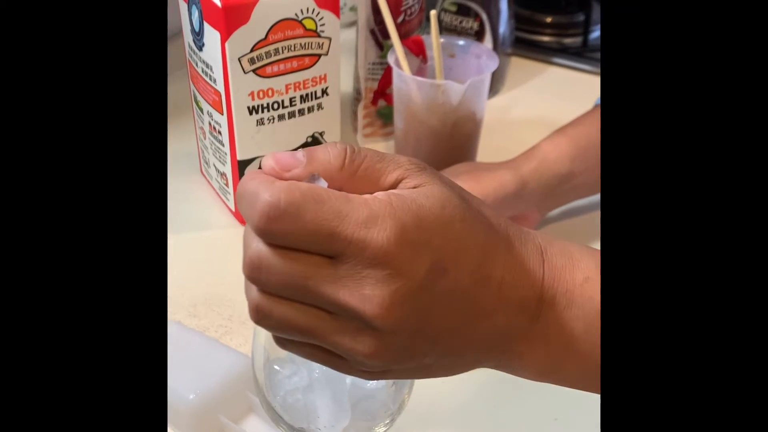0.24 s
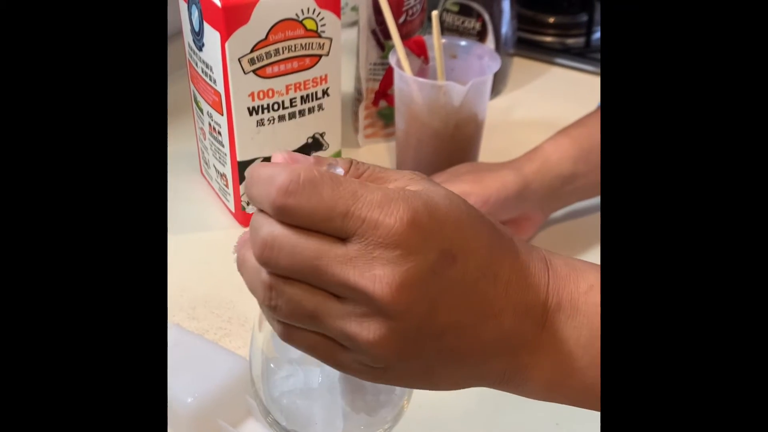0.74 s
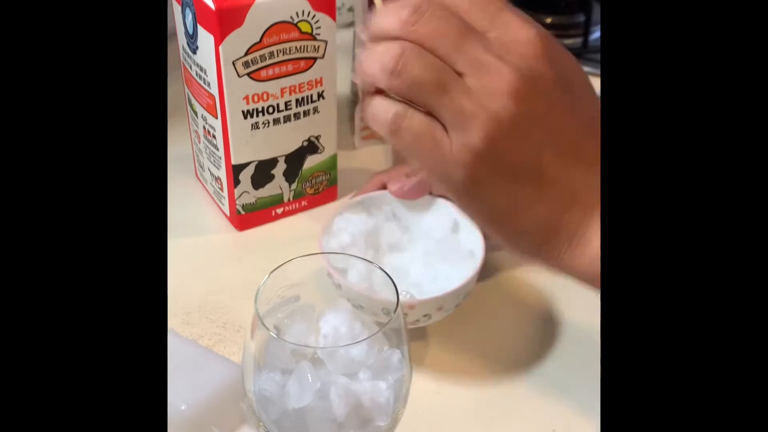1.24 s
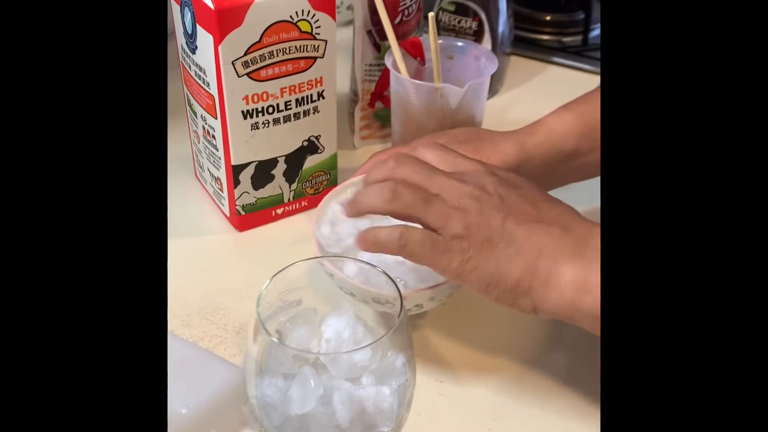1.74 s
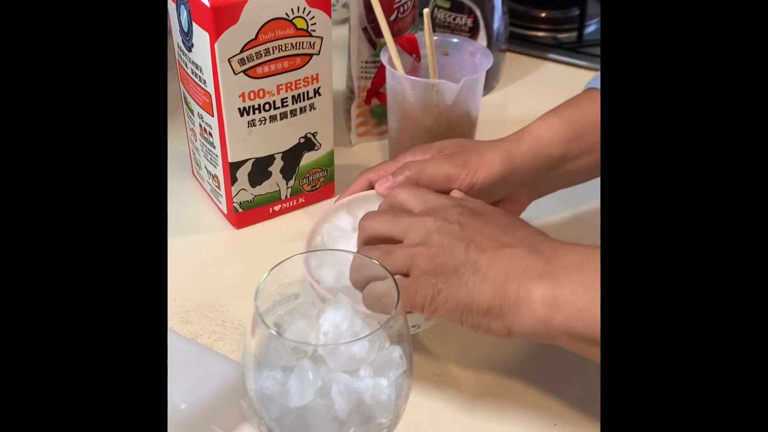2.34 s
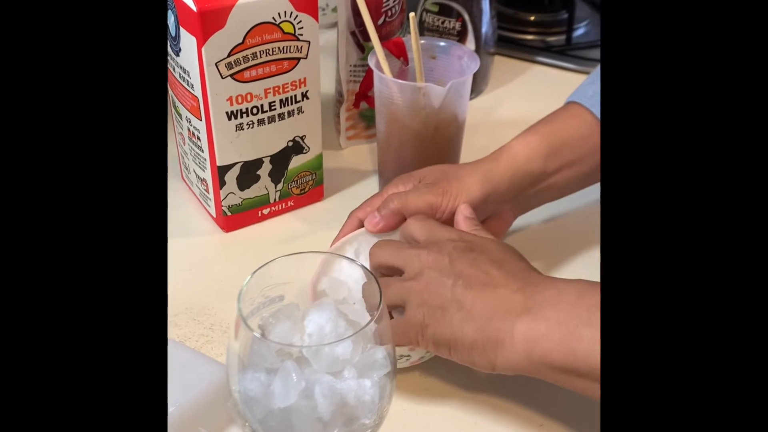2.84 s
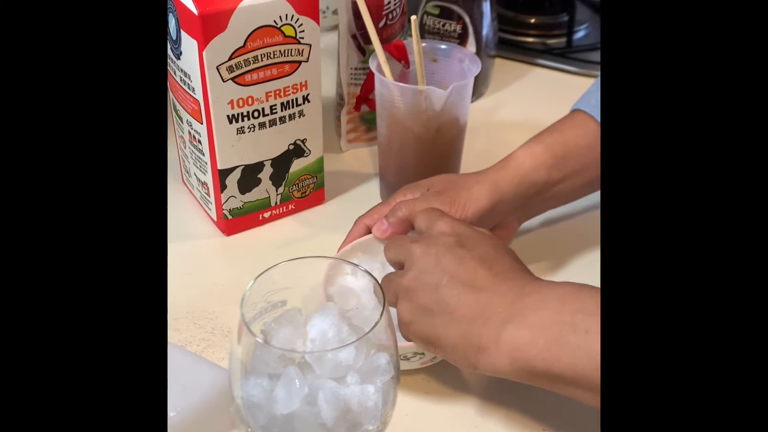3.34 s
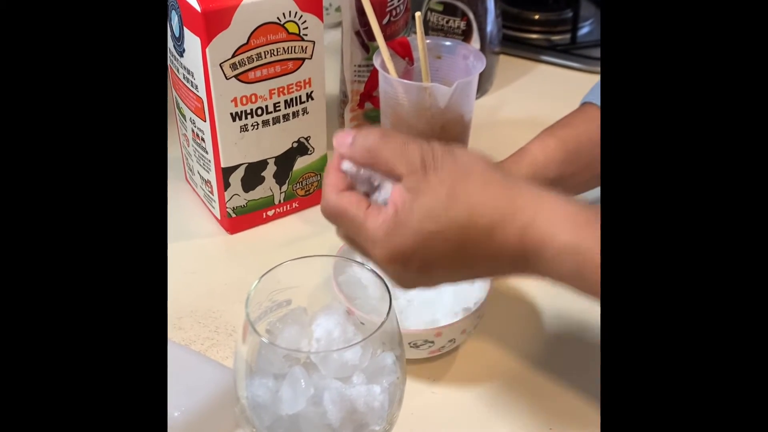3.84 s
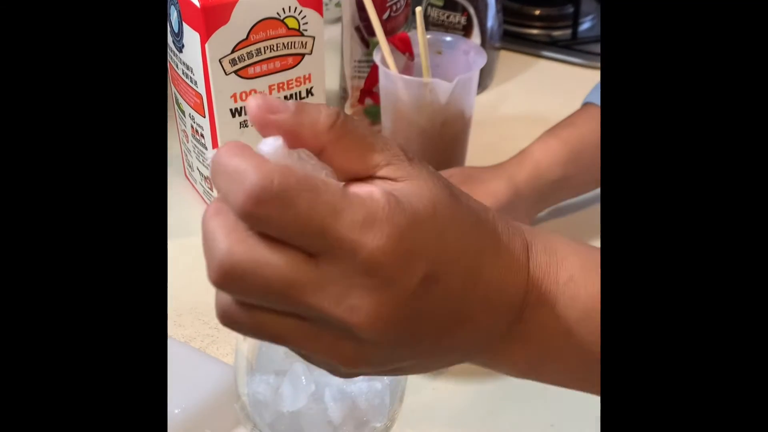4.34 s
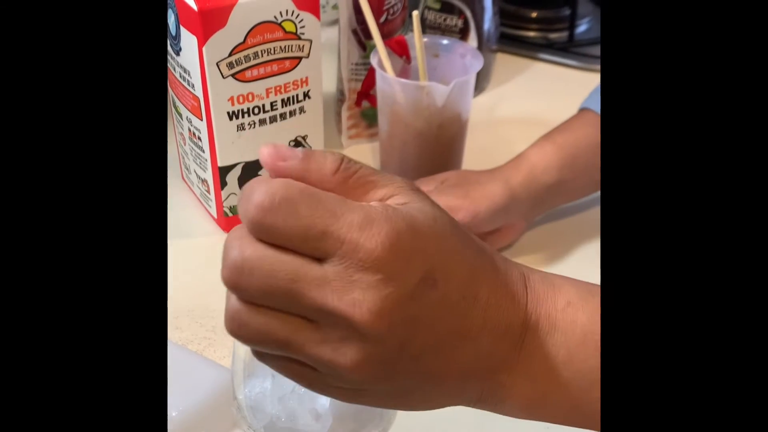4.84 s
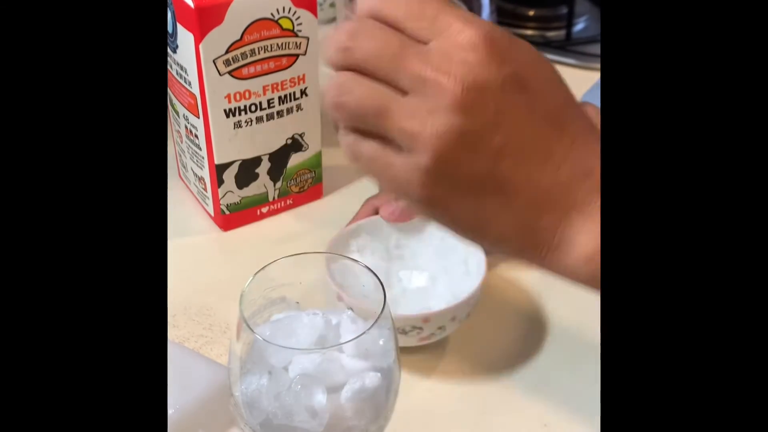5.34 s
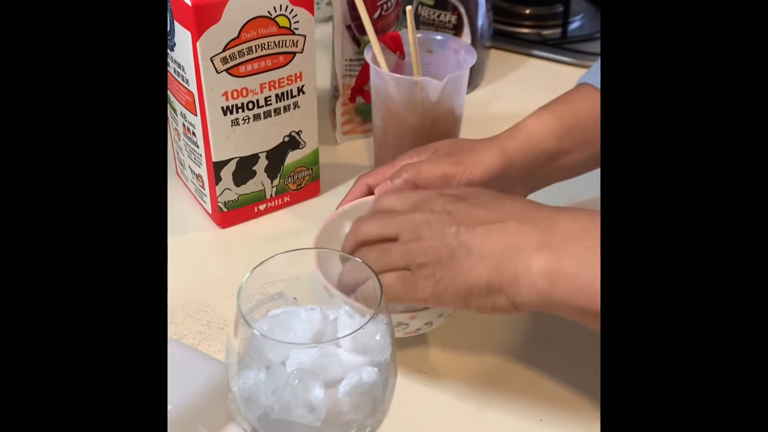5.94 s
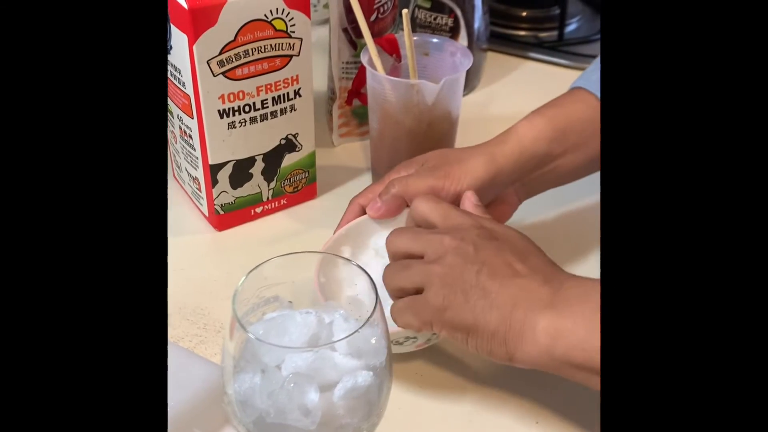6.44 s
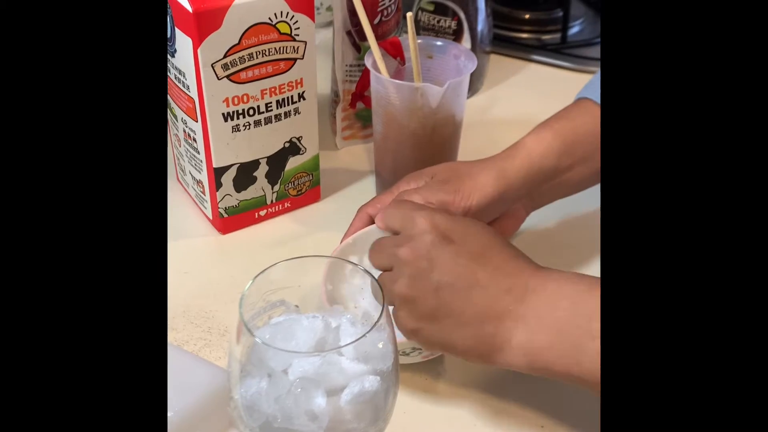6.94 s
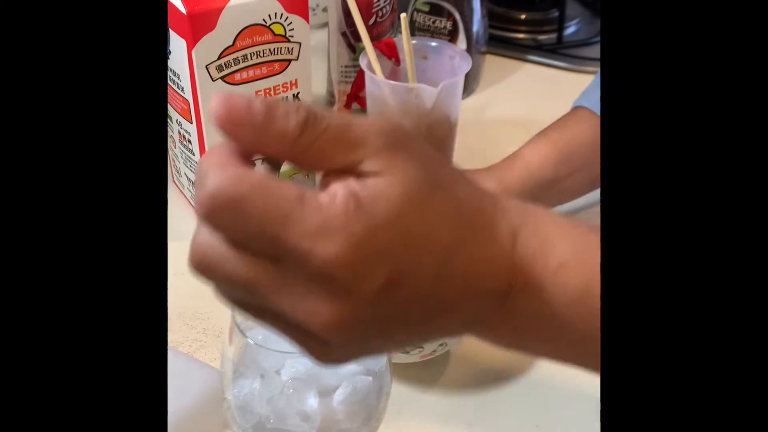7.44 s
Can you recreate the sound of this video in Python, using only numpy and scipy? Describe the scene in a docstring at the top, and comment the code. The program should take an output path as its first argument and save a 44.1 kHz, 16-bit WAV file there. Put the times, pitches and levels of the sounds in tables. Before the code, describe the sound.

A low, slightly unsteady appliance hum and soft room noise run throughout, in a small hard kitchen heard closely in stereo. Faint sliding begins at once; from 0.25 to 0.6 seconds ice cubes tumble into a glass of ice, bright, dry clinks peaking near 0.5 to 0.6, with another cluster at 0.8 to 0.9 and stray ticks until 1.2. From 1.4 to 3.7 fingers dig in a china bowl of wet ice: uneven crunching, scrapes and brittle snaps, strong near 1.6, 2.2 and 3.0. The bowl knocks hard on the counter at 2.8 and slightly softer at 3.1, the loudest events. Soft rubbing follows near 3.8 to 4.5. A second handful clinks in from 4.54 to 4.9. Quieter digging runs from about 5.5 to 7.0, with a sharper snap at 6.4. A very faint raspy squeak comes at 7.1, then a soft dull bump with a low tail at 7.4.

```python
"""On a kitchen counter, ice cubes slip from a fist into a glass already half full of ice.
Each landing is a burst of noise plus the fading tones of cube, glass and hollow; slides are many tiny ticks.
Between handfuls the fingers dig through wet ice in a china bowl: crunching ticks and short snaps.
The bowl knocks hard on the counter twice, and one soft, dull bump with a low tail comes near the end.
An appliance hums over low air noise; the small hard room answers, and two close microphone ports listen."""
import sys
import numpy as np
from scipy import signal
from scipy.fft import rfft, irfft, next_fast_len
from scipy.io import wavfile

SR = 44100
rng = np.random.default_rng(int(sys.argv[2]) if len(sys.argv) > 2 else 0)


def wav_out(sig):
    """Save sig, one row per channel (or a flat mono array), as 16-bit PCM at SR to the path in sys.argv[1]."""
    wavfile.write(sys.argv[1], SR, np.round(np.clip(np.atleast_2d(sig).T, -1, 1) * 32767).astype(np.int16))


N = 338567  # length of the scene in samples
TOP_HZ = 16200  # upper band limit
STIR_ATTACK_S, STIR_RELEASE_S = 0.033, 0.22  # a hand movement builds up, then lets go (release is a t60)

# colour of ice cracking against ice: (frequency [Hz], gain [dB])
CRACK_COLOUR = [(80, -5), (300, 8.5), (950, 9.5), (1500, 4), (2550, 5.5), (3000, -3.5), (3900, 1),
                (5000, 6), (7000, 2), (9500, 2.5), (12000, 1.5), (14000, -1), (16000, -15)]
# colour of cubes tumbling over the pile: (frequency [Hz], gain [dB])
TUMBLE_COLOUR = [(100, -10), (300, -15.5), (620, 1.5), (840, 0.5), (1150, -2), (1500, -15), (2100, -4.5),
                 (2550, 0), (2950, -15), (5000, -15), (10000, -31.5)]
# resonances of the ice-filled bowl: (frequency [Hz], width [Hz], lift [dB])
BOWL_MODES = [(1190, 150, 12), (2245, 320, 8), (3386, 600, 2.5), (5830, 810, 6), (8700, 165, 4),
              (15300, 630, 7.5)]


def amp(db):
    """Turn decibels into a plain multiplier."""
    return 10 ** (np.asarray(db) / 20)


def unit(x):
    """Scale a sound to an rms of 1."""
    return x / np.sqrt(np.mean(x ** 2) + 1e-20)


def along(points, hz):
    """Read a curve of (frequency [Hz], value) points on a log frequency axis."""
    f, v = np.transpose(points)
    return np.interp(np.log(hz + 1), np.log(f + 1), v)


def fade(t, t60):
    """Exponential decay that falls by 60 dB in t60 seconds."""
    return np.exp(-np.log(1000) * t / np.maximum(t60, 1e-4))


def add(track, s, sound):
    """Mix a sound into a track at s seconds."""
    i = max(round(s * SR), 0)
    track[..., i:i + sound.shape[-1]] += sound[..., :track.shape[-1] - i]


def filtered(x, response):
    """Multiply the spectrum of x by a (possibly complex) response of frequency."""
    n = x.shape[-1]
    padded = next_fast_len(n + 4096)
    return irfft(rfft(x, padded) * response(np.fft.rfftfreq(padded, 1 / SR)), padded)[..., :n]


def coloured(x, gain, size=2048):
    """Pass x through a filter that never sounds ahead of its input, with the given gain of frequency."""
    cepstrum = irfft(np.log(np.maximum(gain(np.fft.rfftfreq(size, 1 / SR)), 1e-6)))
    # folding the cepstrum onto its first half puts the filter's energy as early as possible
    cepstrum[1:size // 2] *= 2
    cepstrum[size // 2 + 1:] = 0
    impulse = irfft(np.exp(rfft(cepstrum)))
    return signal.fftconvolve(x, impulse)[:len(x)]


def in_colour(x, colour):
    """Give x the colour of a table of (frequency [Hz], gain [dB])."""
    return coloured(x, lambda hz: amp(along(colour, hz)))


def stroke(start, length, attack, sag_db, release):
    """Gain of one movement: it builds up, holds while sagging by some dB a second, then dies away."""
    t = np.maximum(np.arange(N) / SR - start, 0)
    build = np.minimum(t / attack, 1)
    return build * amp(-sag_db * t) * fade(np.maximum(t - length, 0), release)


def catching(per_second, depth_db):
    """Ice catches and slips: a quickly changing random gain."""
    knots = rng.standard_normal(4096)
    at = np.arange(N) / SR * per_second
    return amp(depth_db * np.interp(at, np.arange(len(knots)), knots))


def grains(per_second, spread_db, top_hz, t60):
    """Tiny slips at random moments, each a very short tick with its own pitch and size."""
    when, pitch, size, side = rng.random((int(per_second * N / SR), 4)).T[:, :, None]
    k = np.arange(SR // 400)  # each tick is cut at 2.5 ms
    strength = np.sign(side - .5) * amp(-spread_db * np.log(np.maximum(size, .04)))
    ticks = strength * fade(k / SR, t60) * np.sin(2 * np.pi * top_hz * pitch * k / SR)
    places = (when * N).astype(int) + k
    return np.bincount(places.ravel(), ticks.ravel(), N)[:N]


def wavering(hz, width_hz):
    """A tone of rms 1 whose strength and phase drift."""
    knots = rng.standard_normal((2, 1024))
    at = np.arange(N) / SR * width_hz
    a, b = (np.interp(at, np.arange(len(k)), k) for k in knots)
    phase = 2 * np.pi * hz * np.arange(N) / SR
    return unit(a * np.cos(phase) + b * np.sin(phase))


def contact_gain(hz, clack_db, knock_db):
    """Heavier contacts put more into the middle and low range."""
    return amp(along([(1800, knock_db), (3600, clack_db), (8500, clack_db), (11000, 0.0063)], hz))


def clinks(ring_db=0.0, cube_db=0.0, crack_db=2, crack_t60=0.021, clack_db=-1, knock_db=-5):
    """Each cube cracks against the pile, sounds its own note and rings the glass more or less strongly."""
    # ice landing in the glass: (time [s], bright level [dB], relative body level [dB],
    # relative glass ring level [dB], cube's note [Hz], relative note level [dB])
    landings = [(0.2364, -37, -6, -4, 3400, -20), (0.369, -40, -7.5, -0.5, 6030, -3),
                (0.3872, -39.5, -4.5, 8.5, 3800, -18), (0.4387, -43.5, 1, -14, 2490, 10.5),
                (0.4561, -43, 6.5, -11, 3450, 0.5), (0.4823, -27, -3, -7, 4950, 7),
                (0.487, -22.5, -9.5, -9.5, 6180, 5), (0.5196, -24, -10.5, 0, 3800, -8),
                (0.533, -35, -2.5, -5, 3420, 0), (0.582, -17, -16.5, 4.5, 8560, 1.5),
                (0.5912, -19.5, -16, -8, 12450, -14), (0.775, -60, 4, -13, 4550, 9),
                (0.799, -34, -7, 0.5, 3830, -1), (0.822, -39, 0, -5.5, 2440, 2.5),
                (0.864, -41, 5, -4, 6760, -5), (0.8803, -23, 3.5, -7, 6700, -3),
                (0.8888, -22, 2, -10, 7130, -1.5), (0.897, -32.5, 10, -12, 7950, -5),
                (0.977, -40, -0.5, -3.5, 6000, 1), (1.035, -34.5, 5.5, -8.5, 6680, -5),
                (1.1662, -43.5, -3, -6.5, 5000, -5), (4.5423, -24, -7, -7.5, 1796, 7),
                (4.592, -34.5, 4.5, -12, 5300, 4.5), (4.608, -36, -13.5, 0, 12400, 1.5),
                (4.6154, -20, -17, -6, 3830, -4.5), (4.6444, -25.5, 1, 6, 3860, -4),
                (4.686, -39.5, 1.5, -9.5, 1870, -5), (4.7119, -17, -20, 5.5, 3820, -4),
                (4.7513, -20, -9, 3, 5965, -8), (4.825, -30, -4, -3, 6160, -10),
                (4.887, -27, -8, -15, 5330, -11)]
    out, t = np.zeros(N), np.arange(SR // 5) / SR
    for s, db, body, ring, cube_hz, note in landings:
        burst = rng.standard_normal(len(t)) * fade(t, crack_t60) * (1 - fade(t, 0.0041))
        crack = in_colour(burst, CRACK_COLOUR)
        glass = amp(ring_db + ring) * glass_ring(t, scatter_db=2.5)
        cube = amp(cube_db + note) * cube_ring(t, cube_hz)
        hit = glass + cube + amp(crack_db) * crack
        weighted = coloured(hit, lambda hz: contact_gain(hz, body + clack_db, body + knock_db))
        add(out, s, amp(db) * weighted)
    return out


def glass_ring(t, scatter_db):
    """The glass's modes, at new strengths for each point of contact, nudged in pitch by the shifting ice."""
    # modes of the glass, damped by its ice: (frequency [Hz], level [dB], t60 [s])
    glass_modes = [(2105, -12.5, .06), (2420, -10.5, 0.0697), (3850, -16, 0.095), (5965, -4.5, 0.044),
                   (7040, -18, 0.038), (8540, -6.5, 0.055), (11150, -12.5, .045), (11200, -8, 0.057),
                   (11660, -13.5, .035), (12180, -8.5, 0.04), (14240, -17, .04)]
    hz, db, t60 = np.transpose(glass_modes)[:, :, None]
    size, detune = rng.standard_normal((2, len(glass_modes), 1))
    tones = np.sin(2 * np.pi * hz * (1 + 0.0033 * detune) * t)
    return np.sum(amp(db + scatter_db * size) * fade(t, t60) * tones, axis=0)


def cube_ring(t, hz, ratio_spread=0.073):
    """A cube's own brief note; its uneven shape shifts the upper modes."""
    # modes of an ice cube: (ratio to its lowest note, level [dB], t60 [s])
    cube_modes = [(1, -2.5, 0.044), (1.39, -8.5, .02), (1.93, -10.5, 0.016)]
    ratio, db, t60 = np.transpose(cube_modes)[:, :, None]
    modes = hz * ratio ** (1 + ratio_spread * rng.standard_normal(ratio.shape))
    tones = amp(db) * fade(t, t60) * np.sin(2 * np.pi * modes * t)
    return np.sum((modes < TOP_HZ) * tones, axis=0)


def bumps(clack_db=-2, clack_t60=0.013, scatter_db=3):
    """A cube landing flat on the pile gives a dull clack that rings the hollow of the glass."""
    # cubes dropping flat on the pile: (time [s], relative level [dB])
    drops = [(0.429, -34), (0.4406, -31), (0.466, -28.5), (0.4755, -27.5), (0.492, -34.5), (0.5218, -36.5),
             (0.534, -37.5), (0.554, -37.5), (0.826, -29.5), (0.8907, -24), (0.9022, -33.5), (4.683, -36.5),
             (4.6998, -35.5), (4.7204, -29.5), (4.7518, -38), (4.76, -36)]
    # the hollow of the glass and the pile in it: (frequency [Hz], level [dB], t60 [s])
    hollow_modes = [(830, 0, .05), (1400, -2, .02), (1860, -3, .022), (2500, -1, .025)]
    out, t = np.zeros(N), np.arange(SR // 8) / SR
    hz, db, t60 = np.transpose(hollow_modes)[:, :, None]
    for s, level_db in drops:
        size, detune = rng.standard_normal((2, *hz.shape))
        tones = np.sin(2 * np.pi * hz * (1 + 0.025 * detune) * t)
        ring = np.sum(amp(db + scatter_db * size) * fade(t, t60) * tones, axis=0)
        clack = in_colour(rng.standard_normal(len(t)) * fade(t, clack_t60), TUMBLE_COLOUR)
        hit = unit(ring) + amp(clack_db) * unit(clack)
        add(out, s, amp(level_db + 5) * hit / np.abs(hit).max())
    return out


def sliding(hiss_db=-1, tumble_db=-2.0, ring_db=-30):
    """Wet cubes skid and tumble over the pile in many tiny contacts, keeping the glass ringing."""
    # runs of cubes sliding from the fist into the glass:
    # (start [s], length [s], relative hiss level [dB], relative tumble level [dB])
    runs = [(0, 0.088, -62.5, -78.5), (0.168, .11, -58, -71.5), (0.343, 0.059, -48, -59.5),
            (0.423, 0.15, -37.5, -47.5), (0.797, 0.033, -43.5, -42), (0.881, 0.069, -43, -46.5),
            (0.918, 0.16, -54.5, -58), (4.525, 0.045, -44, -39), (4.672, 0.078, -33, -42.5),
            (4.809, 0.15, -59.5, -61)]
    hiss, tumble = np.zeros((2, N))
    for start, length, run_hiss_db, run_tumble_db in runs:
        # a run gathers speed, slows by 17.5 dB a second, and settles
        run = stroke(start, length, attack=0.02, sag_db=17.5, release=0.095)
        hiss += amp(run_hiss_db) * run
        tumble += amp(run_tumble_db) * run
    slips = grains(per_second=900, spread_db=4.0, top_hz=15500, t60=0.0042)
    ring = signal.fftconvolve(slips, glass_ring(np.arange(SR // 8) / SR, scatter_db=3.0))[:N]
    skid = unit(in_colour(slips, CRACK_COLOUR) + amp(ring_db) * ring)
    large_contacts = grains(per_second=300, spread_db=2.0, top_hz=4580, t60=0.00476)
    roll = unit(in_colour(large_contacts, TUMBLE_COLOUR))
    return amp(hiss_db) * hiss * skid + amp(tumble_db) * tumble * roll


def digging(scrape_db=-2, tick_db=1, tick_rise=0.00353, tick_t60=0.016, clack_db=1, knock_db=-6):
    """Stirred ice crunches in the bowl; now and then a cube grinds free with a snap."""
    # the hand rustling in the ice, in the bowl or round a fistful: (start [s], length [s], relative level [dB])
    rustles = [(1.418, 0.63, -59.5), (2.096, 1.646, -58), (3.71, 0.22, -65.5), (4.214, 0.34, -67),
               (5.99, 1.135, -63), (7.55, 0.3, -66)]
    # single pushes of the fingers through the bowl: (start [s], length [s], relative level [dB])
    pushes = [(1.564, 0.091, -50), (1.844, 0.098, -51), (1.898, 0.029, -43.5), (2.162, 0.1, -48),
              (2.263, 0.047, -45.5), (2.409, 0.096, -45.5), (2.545, 0.085, -42), (2.747, 0.045, -47),
              (2.931, 0.082, -38), (3.073, 0.4, -49), (3.388, 0.039, -41), (3.511, 0.1, -50),
              (5.647, 0.17, -54.5), (5.982, 0.15, -55), (6.138, 0.14, -51.5), (6.297, 0.081, -50),
              (6.543, 0.067, -50), (6.654, 0.047, -45.5), (6.853, 0.05, -56)]
    # cubes snapping past each other:
    # (time [s], relative bright level [dB], relative body level [dB], pitch rung most [Hz])
    snaps = [(1.38, -38.5, -12, 5820), (1.4562, -49, 4, 5800), (1.5875, -40.5, 6, 4000),
             (1.6223, -24.5, -3, 4900), (1.726, -48.5, 4.5, 7000), (1.746, -39, -4.5, 8080),
             (1.8385, -35.5, 4.5, 3960), (1.9034, -39, -3, 2400), (1.9521, -34.5, 1.5, 5900),
             (1.9652, -28.5, 1, 5900), (2.1139, -52.5, 2, 3300), (2.1885, -25.5, -14.5, 1230),
             (2.3146, -32.5, -5, 5800), (2.4844, -34.5, -3.5, 5800), (2.579, -33, 4.5, 3330),
             (2.9785, -22, 1, 1240), (3.2147, -38, 1.5, 1204), (3.4175, -38, 5.5, 5570),
             (3.617, -51, 3.5, 3290), (4.0067, -47.5, -0.5, 6880), (5.125, -49, -21.5, 8870),
             (5.4693, -49.5, -7, 5800), (5.678, -49, 4.5, 5750), (5.9714, -45, -1, 5880),
             (6.0293, -43, -0.5, 1260), (6.18, -45.5, 6, 2370), (6.3595, -49, -2, 5800),
             (6.418, -32.5, 5.5, 4400), (6.5924, -40, 1.5, 3250), (6.7082, -48.5, 9.5, 3180),
             (6.861, -39.5, -6.5, 7220), (6.9194, -42, -3, 5800)]
    effort = sum(amp(db) * stroke(start, length, STIR_ATTACK_S, 0, STIR_RELEASE_S)
                 for start, length, db in rustles)
    for start, length, db in pushes:
        push = stroke(start, length, STIR_ATTACK_S, sag_db=6, release=STIR_RELEASE_S)
        effort = np.maximum(effort, amp(db) * push)
    crunch = grains(per_second=1500, spread_db=2.0, top_hz=15880, t60=0.0026)
    crunch = crunch * catching(per_second=150, depth_db=2.0)
    # stirred cubes jam and give way under the fingers
    effort = effort * unit(catching(per_second=45, depth_db=3))
    broken_ice = unit(crunch) + amp(-1) * unit(chips())
    out = amp(scrape_db) * effort * unit(coloured(broken_ice, bowl_gain))
    t = np.arange(SR // 8) / SR
    for s, db, body, focus_hz in snaps:
        snap = rng.standard_normal(len(t)) * fade(t, tick_t60) * (1 - fade(t, tick_rise))
        hit = coloured(snap, bowl_gain) + amp(-6) * bowl_ring(t, focus_hz)
        weighted = coloured(hit, lambda hz: contact_gain(hz, body + clack_db, body + knock_db))
        add(out, s, amp(db + tick_db) * weighted)
    return out


def chips(spread_db=4.5):
    """Sparse sharp ticks of small chips breaking off, 60 a second."""
    when, size = rng.random((int(60 * N / SR), 2)).T
    strength = amp(-spread_db * np.log(np.maximum(size, .08)))
    return np.bincount((when * N).astype(int), strength, N)[:N]


def bowl_gain(hz):
    """Broad scraping colour lifted by the bowl's resonances."""
    # colour of ice scraping: (frequency [Hz], gain [dB])
    scrape_colour = [(200, 1.5), (700, 1.5), (1700, 1.5), (4500, 1.5), (7000, -0.5), (10000, 0), (12200, 2),
                     (14000, -3), (16000, -19.5)]
    lift = sum(amp(db) ** 2 / (1 + (2 * (hz - centre) / width) ** 2) for centre, width, db in BOWL_MODES)
    return amp(along(scrape_colour, hz)) * np.sqrt(1 + lift)


def bowl_ring(t, focus_hz, focus_octaves=0.57, t60=0.026, detune=0.014):
    """The bowl's modes; the point of contact favours those near one pitch."""
    hz = np.transpose(BOWL_MODES)[0][:, None]
    share = 1 / (1 + (np.log2(hz / focus_hz) / focus_octaves) ** 2)
    shifted_hz = hz * (1 + detune * rng.standard_normal(hz.shape))
    return np.sum(share * fade(t, t60) * np.sin(2 * np.pi * shifted_hz * t), axis=0)


def knocks(ring_db=-1.7, ring_spread=0.5, scatter_db=1, thud_db=3.5, thud_t60=0.052, rattle_db=-9,
           rattle_t60=.36, wet_db=-6.5, foot_db=7, foot_hz=1250, foot_t60=0.0034):
    """A hard clack of the bowl's foot, or a soft dull bump, on the counter: ringing tones, thud and rattle."""
    # two hard knocks, then one soft bump made of two rows, the second lengthening it:
    # (time [s], relative level [dB], contact brightness as a treble limit [Hz])
    raps = [(2.802, -11, 2700), (3.1085, -14.3, 2600), (7.389, -36, 700), (7.422, -38.5, 520)]
    # bowl and counter ringing together:
    # (frequency [Hz], relative level [dB], t60 [s], left minus right [dB])
    counter_modes = [(115, -16.5, 0.4, 0), (268, -7.0, 0.29, -1), (325, -11.5, 0.2, -2),
                     (375, -10.0, 0.22, -4), (428, -13.5, 0.22, 1), (500, -11.5, 0.18, -1),
                     (588, -2.0, 0.15, 1), (680, -13.0, 0.18, 3), (790, -5.0, 0.09, 0), (925, 0.0, 0.1, 0),
                     (1032, -12.5, 0.17, 1), (1128, -10.5, 0.17, 0), (1206, -6.5, 0.2, -3),
                     (1281, -3.5, 0.17, 1), (1368, -11.0, 0.24, 0), (1446, -6.5, 0.24, -7),
                     (1503, -13.0, 0.17, -4), (1540, -8.5, 0.16, -1), (1603, -14.0, 0.22, -7),
                     (1648, -8.0, 0.15, -7), (1705, -18.5, 0.16, 1), (1787, -12.0, 0.13, 2),
                     (1900, -17.5, 0.15, 0), (1995, -13.0, 0.16, -2), (2060, -21.5, 0.16, -1),
                     (2145, -16.5, 0.18, -3), (2290, -19.5, 0.18, -1), (2353, -22.5, 0.2, -1),
                     (2640, -19.5, 0.17, -2), (2780, -21.0, 0.15, -2)]
    # colour of the thud: (frequency [Hz], gain [dB])
    thud_colour = [(60, -30), (130, -14), (260, 2), (450, -1), (800, 7), (1400, 5), (2000, -0.5), (2600, 2),
                   (3400, -1), (5000, -4), (12000, 5)]
    # colour of the jolted ice settling after a knock: (frequency [Hz], gain [dB])
    rattle_colour = [(150, -35), (350, -1), (600, 7), (950, -4.5), (1400, -1), (1900, -5), (4000, -14.5)]
    out, t = np.zeros((2, N)), np.arange(SR // 2) / SR
    hz, db, t60, pan_db = np.transpose(counter_modes)[:, :, None]
    rise = 1 - fade(t, 20 / hz)  # a mode takes about 20 cycles to build up
    foot = np.sin(2 * np.pi * foot_hz * t) * fade(t, foot_t60) * (1 - fade(t, 0.0115))
    for s, level_db, bright_hz in raps:
        # neighbouring modes swing opposite ways; the two ports catch each at slightly different phases
        swing = np.pi * np.arange(len(counter_modes))[:, None]
        phase = swing + ring_spread * rng.standard_normal((2, *hz.shape))
        pan = np.array([pan_db, -pan_db]) / 2
        strength = amp(db + scatter_db * rng.standard_normal(hz.shape) + pan)
        ring = np.sum(strength * fade(t, t60) * np.sin(2 * np.pi * hz * t + phase) * rise, axis=1)
        thud = in_colour(rng.standard_normal(len(t)) * fade(t, thud_t60), thud_colour)
        chatter = catching(per_second=160, depth_db=2.5)[:len(t)]
        rattle = in_colour(rng.standard_normal(len(t)) * fade(t, rattle_t60) * chatter, rattle_colour)
        contact = amp(thud_db) * thud + amp(rattle_db) * rattle + amp(foot_db) * foot
        blow = amp(ring_db) * ring + in_kitchen(contact, wet_db, count=1)
        softened = [coloured(port, lambda f: 1 / np.sqrt(1 + (f / bright_hz) ** 6)) for port in blow]
        add(out, s, amp(level_db) * np.array(softened))
    return out


def rubbing(attack=0.06):
    """Skin rubs softly on the fistful of ice as it is carried over: dense tiny slips."""
    # the fist closing round the ice: (start [s], length [s], level [dB])
    rubs = [(3.8, 0.065, -67), (4.247, 0.29, -77), (7.289, 0.23, -69)]
    # colour of rubbing skin: (frequency [Hz], gain [dB])
    skin_colour = [(500, 1), (1500, -1.5), (2800, 1.5), (4300, -1.5), (5500, -9), (8000, -21), (14000, -25)]
    effort = sum(amp(db) * stroke(start, length, attack, 0, STIR_RELEASE_S) for start, length, db in rubs)
    slips = grains(per_second=2500, spread_db=2.0, top_hz=14800, t60=0.0043)
    return effort * unit(in_colour(slips, skin_colour))


def squeak():
    """A brief, faint, raspy squeak as the hand lifts out of the ice: one wavering tone."""
    lift = stroke(start=7.08, length=.09, attack=STIR_ATTACK_S, sag_db=0, release=STIR_RELEASE_S)
    return amp(-66.5) * lift * wavering(hz=1480, width_hz=130)


def background(air_db=-47, hum_db=-2, drift=0.28):
    """An appliance's slightly unsteady hum, a set of tones, over low room noise."""
    # colour of the room noise: (frequency [Hz], gain [dB])
    air_colour = [(20, -19), (45, -3.5), (70, -2), (110, 2.5), (150, -15.5), (300, -10), (650, -17),
                  (850, -21.5), (1600, -26), (3000, -39.5), (6000, -49.5), (13000, -55.5), (16000, -61)]
    # tones of the appliance hum: (frequency [Hz], relative level [dB])
    hum_tones = [(70.0, -48.5), (166.9, -58.5), (263.8, -60), (398.4, -62.5), (430.7, -63.5), (586.8, -62),
                 (646.0, -53)]
    t = np.arange(N) / SR
    air = unit(filtered(diffuse(N), lambda hz: amp(along(air_colour, hz))))
    hum = np.zeros(N)
    for hz, db in hum_tones:
        tone = np.sin(2 * np.pi * hz * t) + drift * wavering(hz, width_hz=22)
        hum += amp(db) * unit(tone)
    return amp(air_db) * air + amp(hum_db) * hum


def diffuse(n):
    """White noise arriving from all sides at the two ports, more or less alike at each frequency."""
    # how alike left and right are: (frequency [Hz], likeness [0 to 1])
    likeness = [(100, 1), (200, 0.63), (450, 0.45), (1500, 0.01436), (3000, 0.1), (4000, 0.033),
                (5000, 0.72), (7000, 1), (15000, 0.98)]

    def mid_side(hz):
        turn = np.arccos(np.clip(along(likeness, hz), 0, 1)) / 2
        return np.array([np.cos(turn), np.sin(turn)])
    mid, side = filtered(rng.standard_normal((2, n)), mid_side)
    return np.array([mid + side, mid - side])


def in_kitchen(x, wet_db, count=24):
    """Direct sound plus fading noise tails of the room, drawn anew for each of count equal stretches of time."""
    # how long the room rings: (frequency [Hz], t60 [s])
    room_decay = [(150, 0.8), (600, 0.26), (2000, 0.2), (6000, 0.14), (14000, 0.13)]
    n = SR // 3
    hz, t, z = signal.stft(diffuse(count * n).reshape(2, count, n), SR, nperseg=256)
    decay = fade(t, along(room_decay, hz)[:, None]) * (t > 0)
    tails = signal.istft(z * decay, SR, nperseg=256)[1]
    tails /= np.sqrt(np.sum(tails ** 2) / (2 * count))
    out, start = np.array([x, x]), 0
    for k, part in enumerate(np.array_split(x, count)):
        answer = signal.fftconvolve(part[None], tails[:, k], axes=1)
        add(out, start / SR, amp(wet_db) * answer)
        start += len(part)
    return out


def scene():
    """Glass and bowl each sound in the room, with the knocks and the background added."""
    glass = in_kitchen(clinks() + bumps() + sliding(), wet_db=-1.5)
    bowl = in_kitchen(digging() + rubbing() + squeak(), wet_db=3.0)
    return glass + bowl + knocks() + background()


def record(dry):
    """The two ports differ in phase and level; nothing is kept above the band limit."""
    # phase between the ports: (frequency [Hz], lead of left over right [rad])
    port_phase = [(0, 0), (440, 0), (520, 1.9), (680, 1.9), (730, 4.3), (950, 4.3), (1250, 3.8), (1400, 6),
                  (1800, 6.5), (2000, 7), (2250, 9.3), (2700, 9.6), (3400, 9.9), (3850, 12.9), (4800, 15.5),
                  (5600, 16.4), (6600, 18.6), (7500, 18.9), (9400, 21.9), (10100, 22.1), (11900, 25.1),
                  (13100, 25.3), (14200, 28), (16000, 28.4)]
    # level between the ports: (frequency [Hz], left minus right [dB])
    port_balance = [(400, 0.5), (750, 0.5), (1200, -1), (1750, -1), (2700, -2.5), (3800, 1), (5500, 0)]

    def ports(hz):
        phase = np.interp(hz, *np.transpose(port_phase))
        half = np.array([[.5], [-.5]])  # each port takes half the difference
        return amp(half * along(port_balance, hz)) * np.exp(1j * half * phase)
    return filtered(filtered(dry, ports), lambda hz: hz < TOP_HZ)


dry = scene()
out = record(dry)
wav_out(out)
```